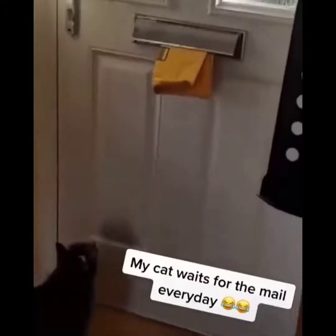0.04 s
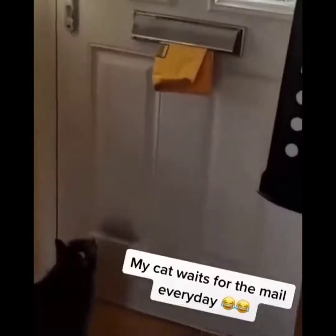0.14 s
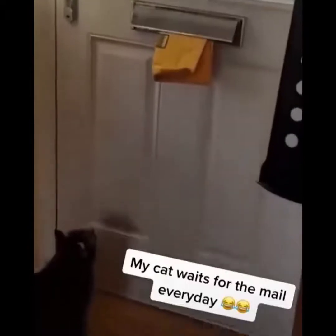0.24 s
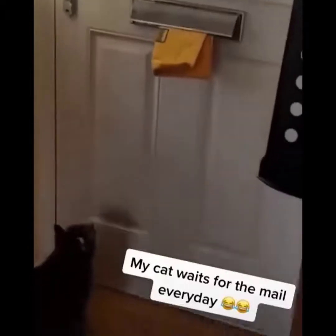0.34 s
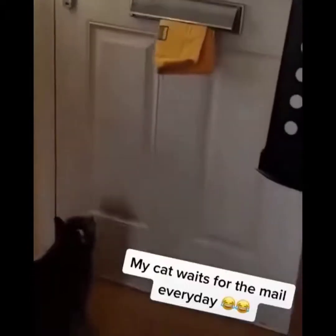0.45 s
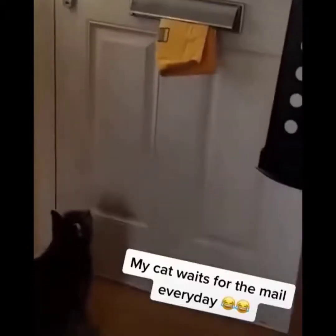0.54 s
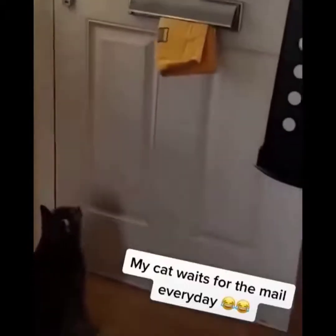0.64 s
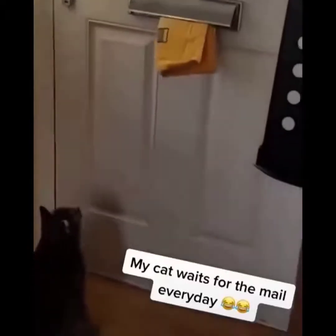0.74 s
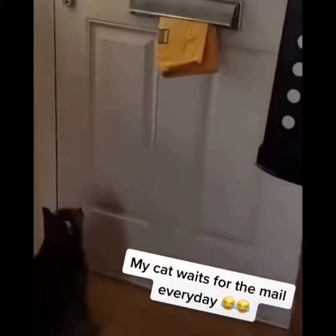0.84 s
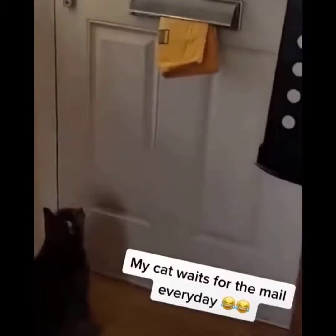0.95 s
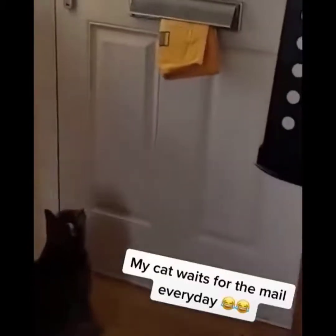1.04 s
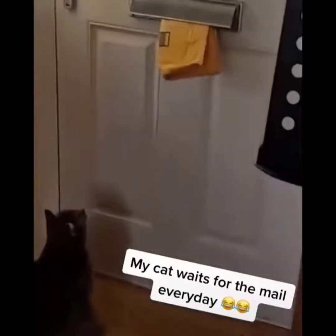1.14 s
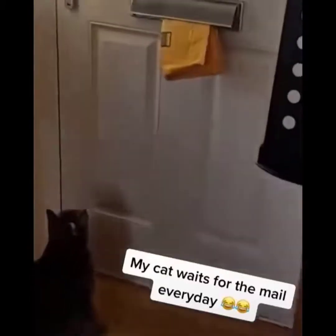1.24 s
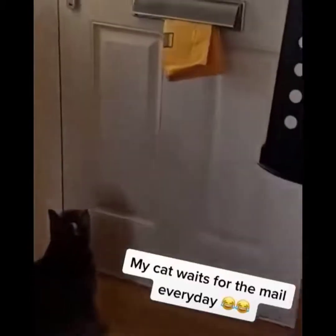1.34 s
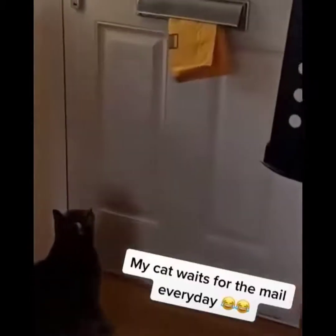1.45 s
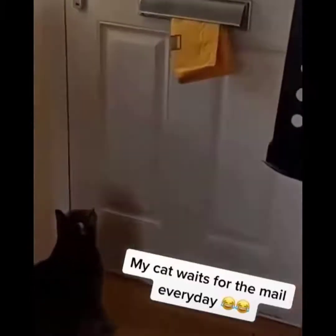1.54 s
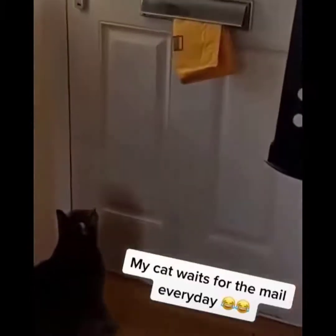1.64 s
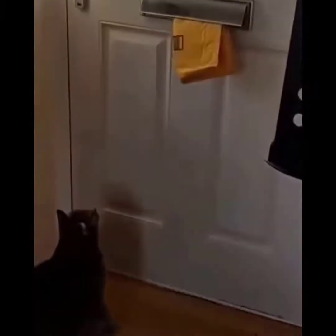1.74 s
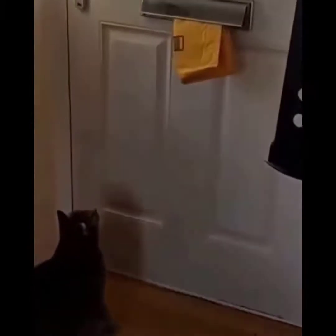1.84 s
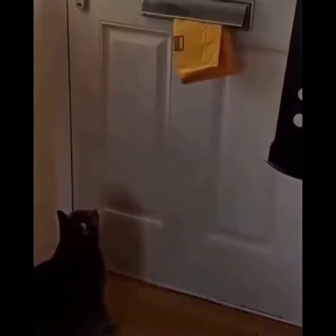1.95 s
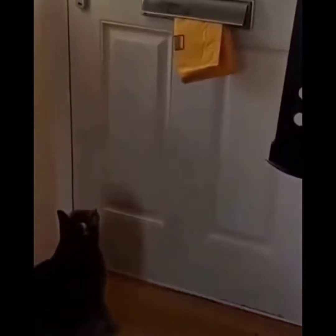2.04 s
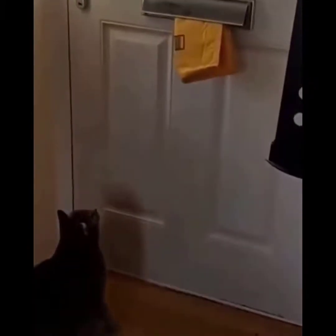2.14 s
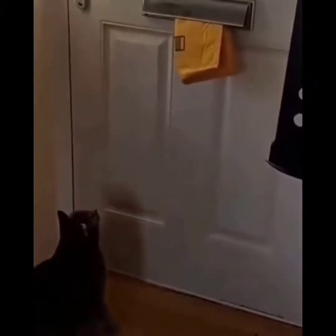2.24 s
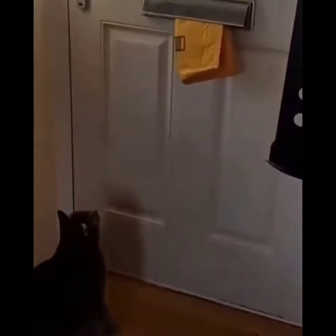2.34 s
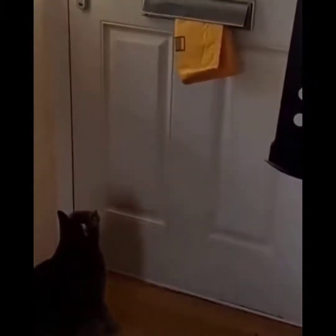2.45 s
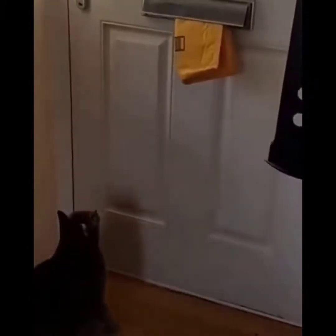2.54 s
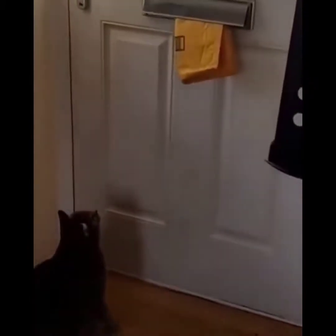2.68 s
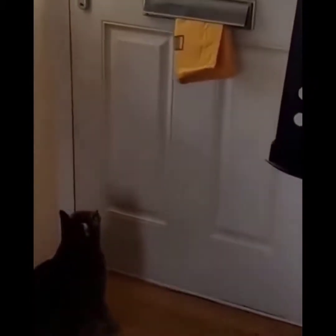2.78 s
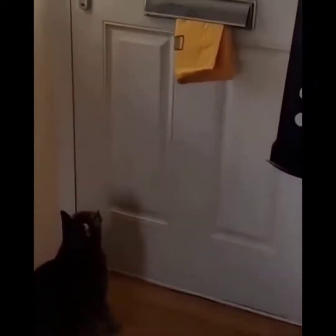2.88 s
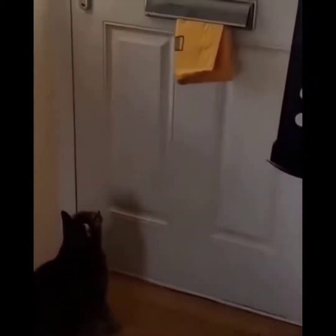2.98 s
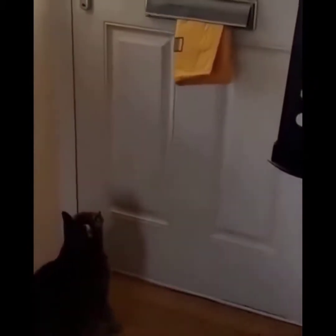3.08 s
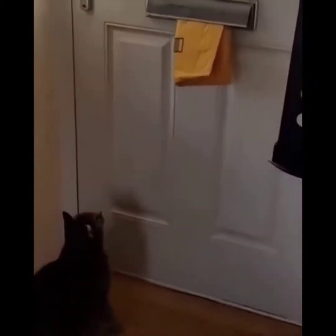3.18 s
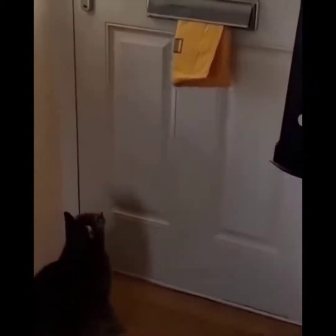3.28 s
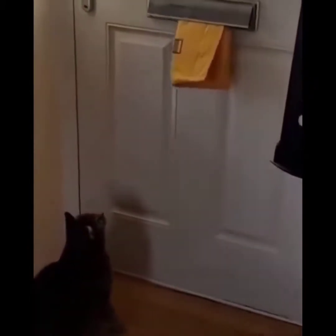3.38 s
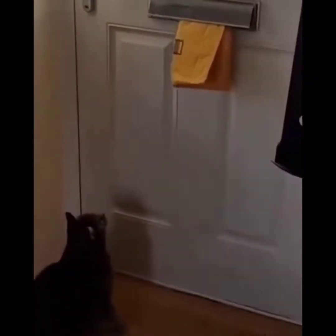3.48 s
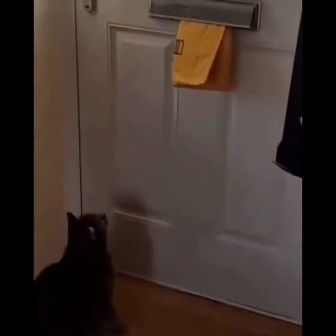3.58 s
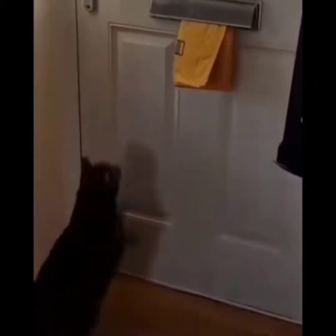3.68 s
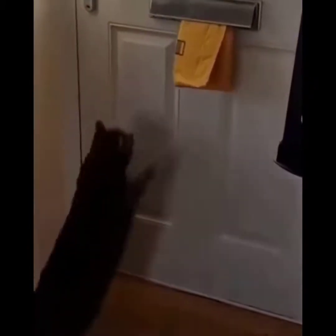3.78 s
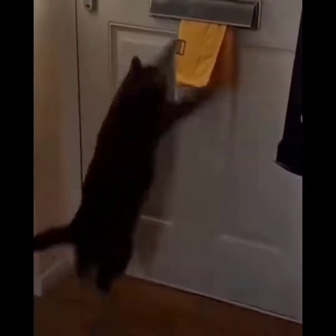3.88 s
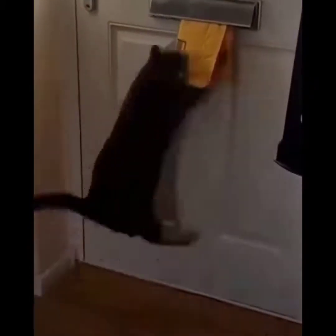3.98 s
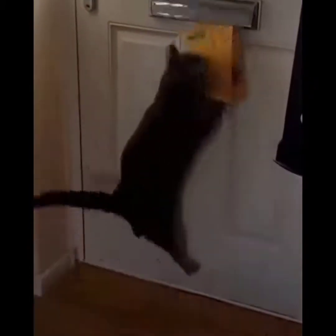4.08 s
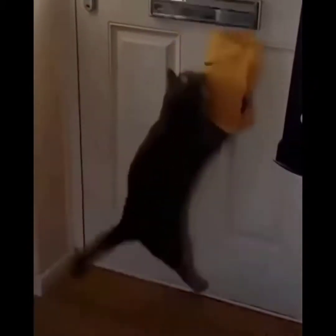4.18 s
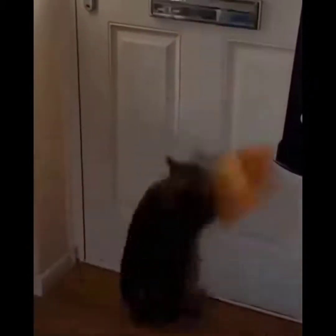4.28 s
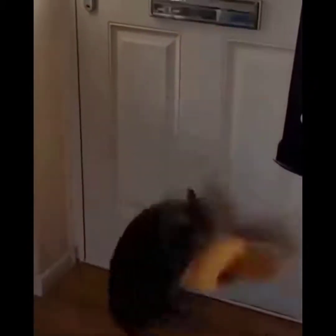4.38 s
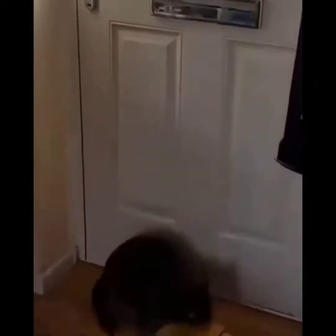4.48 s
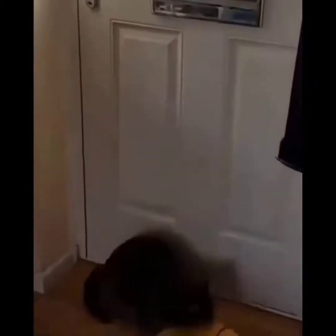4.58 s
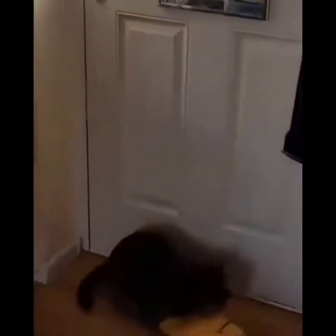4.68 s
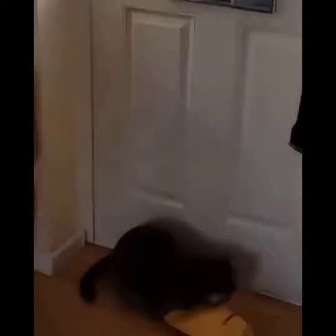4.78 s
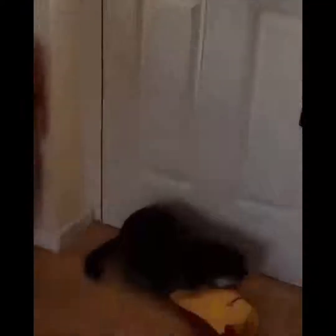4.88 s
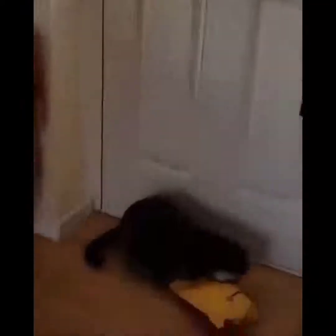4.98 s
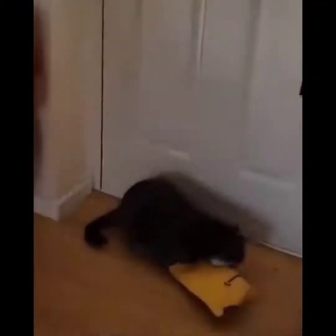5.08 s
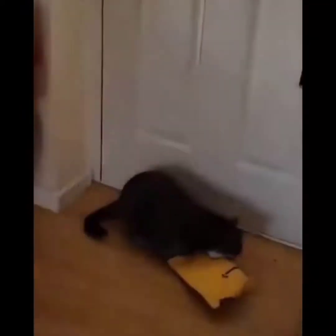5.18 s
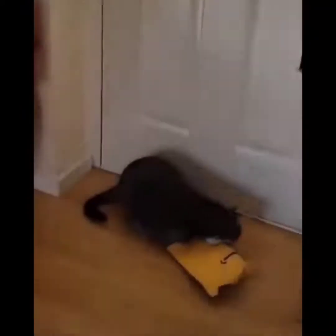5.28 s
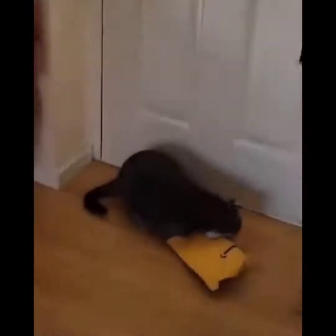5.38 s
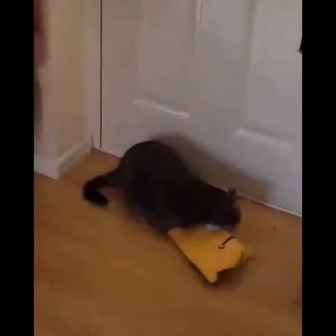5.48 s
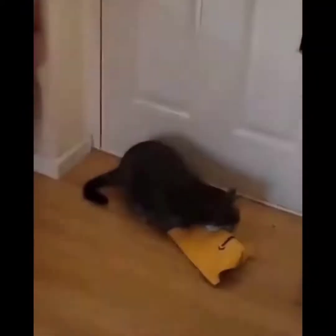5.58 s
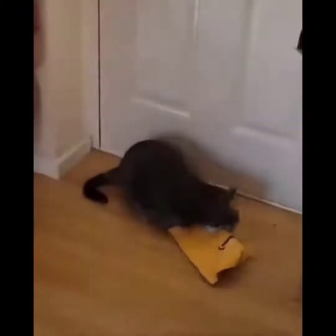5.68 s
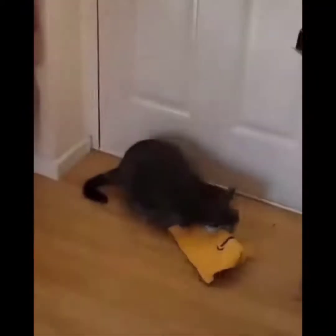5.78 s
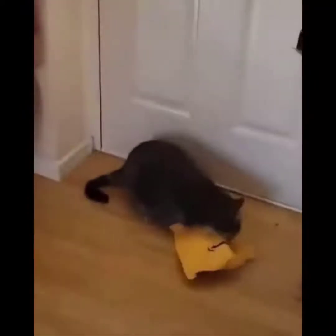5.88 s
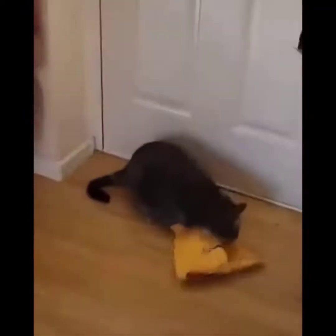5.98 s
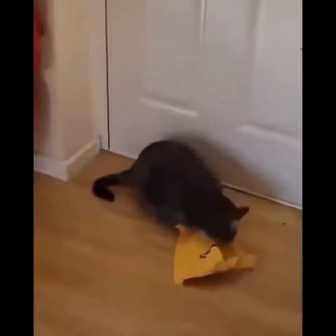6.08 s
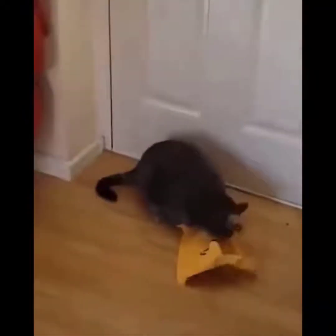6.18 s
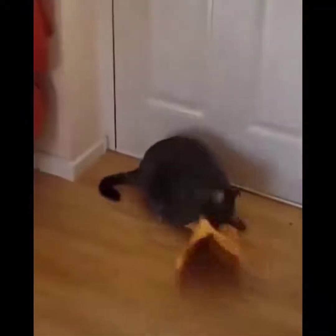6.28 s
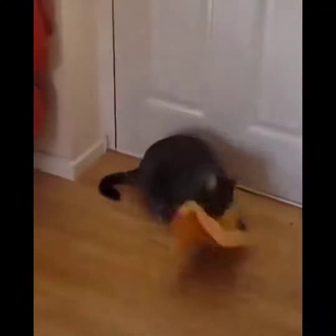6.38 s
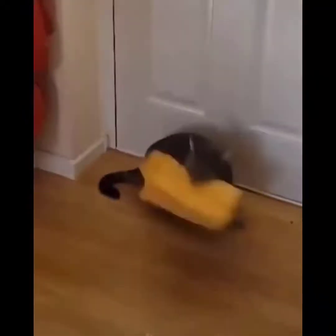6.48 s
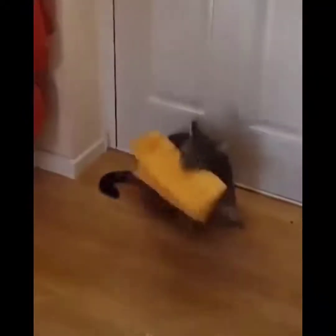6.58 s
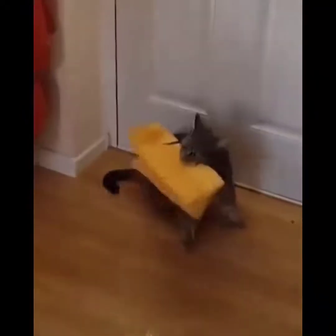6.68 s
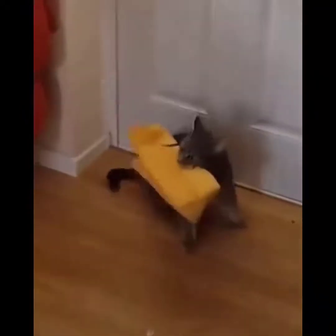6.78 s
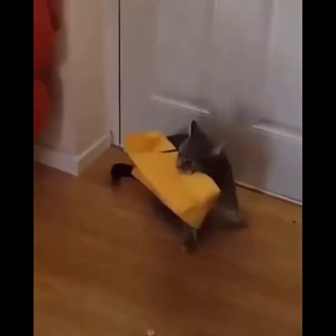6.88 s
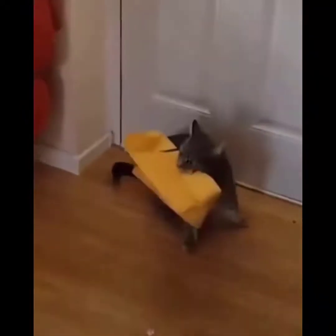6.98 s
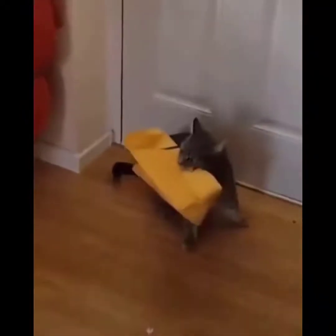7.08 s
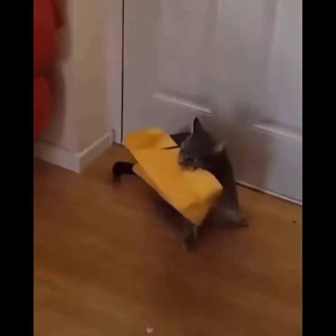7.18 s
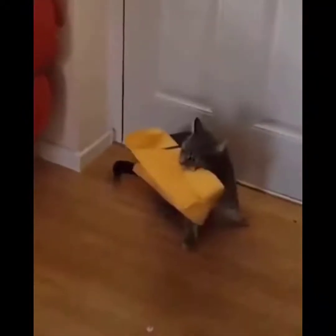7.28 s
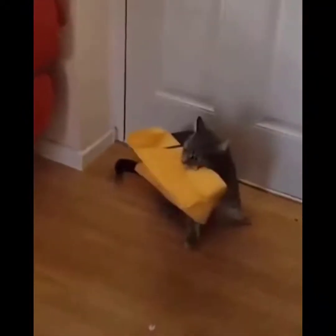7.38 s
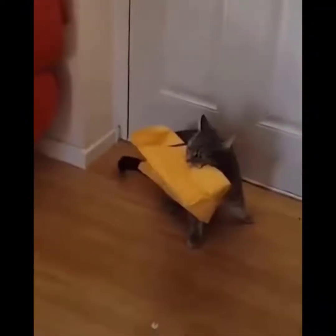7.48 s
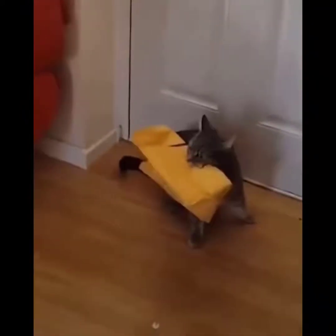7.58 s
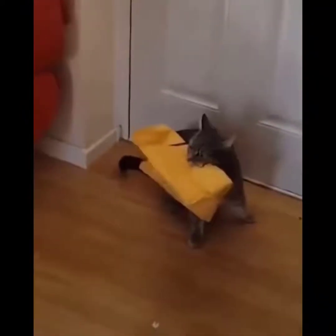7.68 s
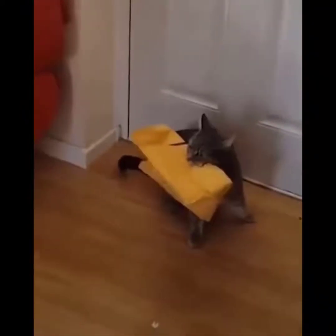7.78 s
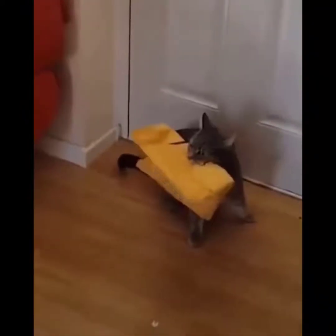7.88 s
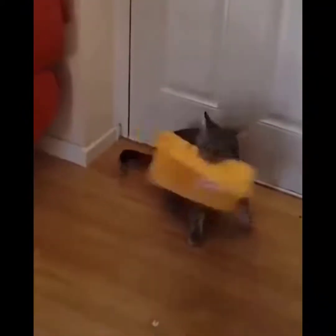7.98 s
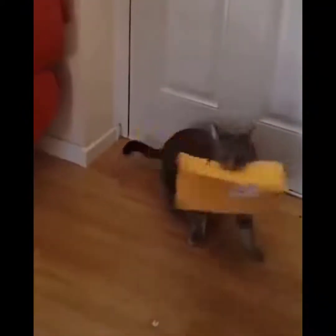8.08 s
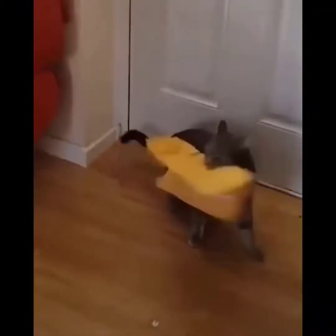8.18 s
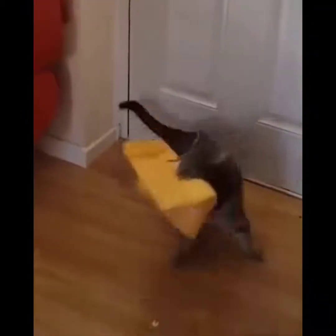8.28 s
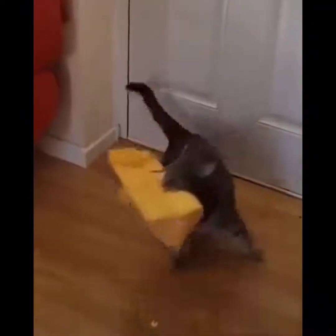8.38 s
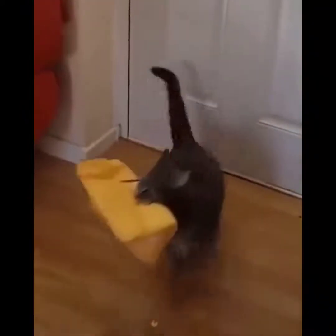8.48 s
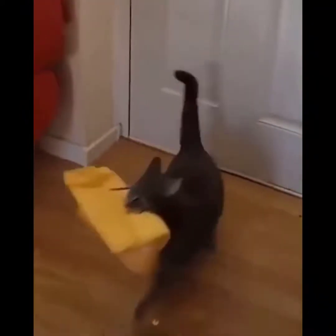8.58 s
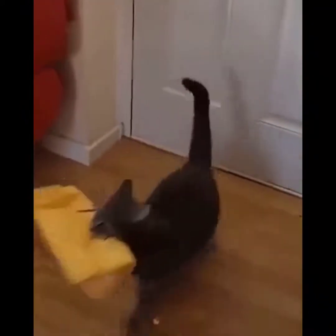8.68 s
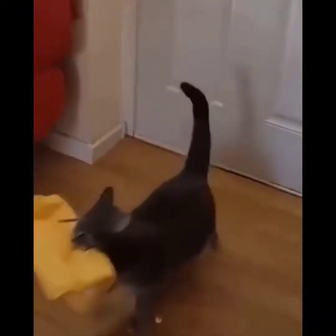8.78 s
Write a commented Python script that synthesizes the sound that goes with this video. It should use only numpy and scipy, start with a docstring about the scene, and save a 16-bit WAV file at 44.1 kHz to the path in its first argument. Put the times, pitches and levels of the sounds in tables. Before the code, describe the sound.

A padded envelope rustles through a metal letterbox, a cat yanks it down, the flap clashes shut and paper crinkles.

```python
"""A padded envelope rubs and crackles as it is worked through the metal letterbox of a front door,
in a small hall with a hard floor. An engine drones outside for the first four seconds or so.
A cat leaps up and tugs the envelope through; cat and parcel land, the door booms and the sprung flaps
clash shut. The cat paws and bites the crinkling paper, then moves off with a soft thump."""
import sys
import numpy as np
from scipy import signal
from scipy.fft import rfft, irfft
from scipy.io import wavfile
from scipy.ndimage import uniform_filter1d

SR = 44100
rng = np.random.default_rng(int(sys.argv[2]) if len(sys.argv) > 2 else 0)


def inscribe(sig):
    """Save sig as 16-bit PCM at rate SR to the path in sys.argv[1].

    A 1-D sig is mono; a 2-D sig holds one channel per row.
    Samples are clipped to [-1, 1] before scaling.
    """
    pcm = np.round(np.clip(np.atleast_2d(sig).T, -1, 1) * 32767)
    wavfile.write(sys.argv[1], SR, pcm.astype(np.int16))


N = 389844

# soft weight coming down on the floor: (time [s], relative level [dB])
LANDINGS = [(4.225, -18.5), (4.293, -28.5), (4.38, -19), (4.4, -9.5), (4.46, -20), (8.272, -17.5),
            (8.299, -22)]


def from_db(db):
    """Turn decibels into a number to multiply a sound by."""
    return 10 ** (np.asarray(db) / 20)


def rms_one(x):
    """Scale a signal so that its average power is 1."""
    return x / np.sqrt(np.mean(x ** 2) + 1e-20)


def at_hz(points, hz):
    """Read between the rows of a (frequency, value) table, spacing octaves evenly."""
    known, values = np.transpose(points)
    return np.interp(np.log(np.maximum(hz, 1)), np.log(known), values)


def drift(per_s):
    """A random wander of about 1 up and down, with per_s new targets a second."""
    targets = rng.standard_normal(N // 20)
    return rms_one(np.interp(np.arange(N) * per_s / SR, np.arange(len(targets)), targets))


def cut(x, hz, keep="low"):
    """Keep what lies below hz ("low"), above it ("high") or between two values ("band")."""
    return signal.sosfilt(signal.butter(2, hz, keep, fs=SR, output="sos"), x)


def colour(x, spectrum, size=8192):
    """Shape the tone by a (frequency, relative level) table; white noise keeps its power."""
    hz = np.maximum(np.arange(size // 2 + 1) * SR / size, 1)
    octaves_below = np.maximum(np.log2(spectrum[0][0] / hz), 0)
    octaves_above = np.maximum(np.log2(hz / spectrum[-1][0]), 0)
    gain = from_db(at_hz(spectrum, hz) - 20 * (octaves_below + octaves_above))
    # build the filter so that nothing sounds ahead of a hit
    cepstrum = irfft(np.log(gain))
    response = irfft(np.exp(rfft(2 * cepstrum * (np.arange(size) < size // 2))))
    return signal.oaconvolve(x, response / np.linalg.norm(response))[:len(x)]


def resonance(x, hz, width_hz):
    """Let through a band of frequencies around hz."""
    return signal.lfilter(*signal.iirpeak(hz, hz / width_hz, fs=SR), x + 1e-18)


def double_resonance(x, hz, width_hz):
    """The same band twice over, for a clearer pitch."""
    return resonance(resonance(x, hz, width_hz), hz, width_hz)


def dying(t60, size=28000):
    """A fade that drops 60 dB in t60 seconds; the tables call this the fade time."""
    return np.exp(-np.log(1000) / (SR * t60) * np.arange(size))


def even(x, smooth_hz=700, size=4096):
    """Level the broad humps in a short sound's tone; the fine detail stays."""
    power = uniform_filter1d(np.abs(rfft(x, size)) ** 2, int(smooth_hz * size / SR))
    hz = np.arange(len(power)) * SR / size
    levelling_db = -10 * np.log10(np.maximum(power, 1e-12))
    return colour(x, np.column_stack([hz, levelling_db])[1:])


def burst(t60, rise_s=0.0029):
    """A shower of tiny contacts that builds up and dies away."""
    decay = dying(t60)
    rise = np.minimum(np.arange(len(decay)) / SR / rise_s, 1)
    return even(decay * rise * rng.choice([-1, 1], len(decay)))


def blow(x):
    """Scale a short sound to the energy of 10 ms at full level."""
    return x * np.sqrt(.01 * SR / np.sum(x ** 2))


def pitched(t60, hz, width_hz):
    """A shower of contacts with one rough pitch."""
    return blow(double_resonance(burst(t60), hz, width_hz))


def ring(notes):
    """A struck object rings with its own notes, each fading at its own pace."""
    t = np.arange(len(dying(1))) / SR
    return sum(from_db(db) * dying(t60) * np.sin(2 * np.pi * hz * t) for hz, db, t60 in notes)


def pressed(x, press_s=.036):
    """Soften a sound's start, as a soft weight comes down gradually."""
    progress = np.minimum(np.arange(len(x)) / SR / press_s, 1)
    return x * np.sin(np.pi / 2 * progress) ** 2


def place(sounds):
    """Lay each (time [s], level [dB], sound) on the time line."""
    out = np.zeros(N)
    for s, db, sound in sounds:
        start = int(s * SR)
        out[start:start + len(sound)] += from_db(db) * sound[:N - start]
    return out


def engine(waver=0.0033, throb_db=4.5, fade_s=.3):
    """The engine's two lowest tones pass the closed door and swell where they meet a note of the hall."""
    # it pulls, eases off to change gear, pulls again: (time [s], firing rate [Hz], relative level [dB])
    driving = [(0, 84.8, -50), (.45, 89, -50.5), (.64, 90.5, -65), (1.3, 80.46, -61), (1.7, 69.7, -64),
               (2.05, 65.1, -66), (2.4, 69.35, -64.5), (2.95, 72.8, -60), (4.1, 80.8, -67.5)]
    # low notes of the hall: (frequency [Hz], width [Hz], gain [dB])
    hall_notes = [(72, 15, 4), (142.4, 4.2, -3), (162, 6, -8), (170, 27, 4.5)]
    t = np.arange(N) / SR
    times, rates, levels = np.transpose(driving)
    hz = np.interp(t, times, rates) * (1 + waver * drift(8.4))
    phase = 2 * np.pi * np.cumsum(hz) / SR
    drone = np.sqrt(2) * from_db(np.interp(t, times, levels)) * (np.sin(phase) + np.sin(2 * phase))
    indoors = sum(from_db(db) * resonance(drone, note_hz, width) for note_hz, width, db in hall_notes)
    fade_out = np.clip(1 + (times[-1] - t) / fade_s, 0, 1)
    return indoors * fade_out * from_db(throb_db * drift(7.6))


def still_air(level_db=-56):
    """The air of the hall makes a faint, low hush."""
    # tone of the hush: (frequency [Hz], relative level [dB])
    hush_tone = [(15, -42.5), (25, -11.5), (70, -0.5), (147, -10.5), (403, -28.5), (868, -31),
                 (1560, -35.5), (2640, -31.5), (9660, -37.5), (12600, -35.5), (14000, -51.5)]
    return from_db(level_db) * colour(rng.standard_normal(N), hush_tone)


def friction(clicks_per_s, clicks_db, flutter_db, spread_db=4.0):
    """Paper fibres hiss while creases catch and let go in uneven clicks."""
    sizes = from_db(spread_db * np.minimum(rng.exponential(1, N), 4)) * rng.choice([-1, 1], N)
    clicks = rms_one(sizes * (rng.random(N) < clicks_per_s / SR))
    hiss = rng.standard_normal(N)
    return rms_one((hiss + from_db(clicks_db) * clicks) * from_db(flutter_db * drift(70)))


def flexing(x, depth_db, per_s, count=21):
    """As the envelope bends, the sound shifts among its many resonances while the loudness holds."""
    edges = np.geomspace(500, 14000, count)
    gains = np.array([from_db(depth_db * np.tanh(drift(per_s))) for _ in range(count - 1)])
    gains /= np.sqrt(np.mean(gains[count // 4:-count // 5] ** 2, axis=0))   # steady the middle bands
    low_body = from_db(11) * cut(x, edges[0])
    bands = sum(gain * resonance(x, np.sqrt(low * high), high - low)
                for gain, low, high in zip(gains, edges, edges[1:]))
    return rms_one(low_body + bands)


def through_slot(x, cavity_db, echo_delays_s=(.0011, .0023, .0047), echo_db=-7):
    """The hollow letterbox colours what rubs inside it; the flap and door face reflect the treble."""
    # notes of the air in the slot: (frequency [Hz], width [Hz], relative level [dB])
    slot_notes = [(815, 99, -9), (1183, 46, 5.5), (2340, 200, -4.5), (2600, 140, -2.5)]
    treble = cut(x, 2500, "high")
    echoes = sum(np.roll(treble, int(s * SR)) for s in echo_delays_s)
    cavity = sum(from_db(db) * resonance(x, hz, width) for hz, width, db in slot_notes)
    return rms_one(x + from_db(echo_db) * echoes + from_db(cavity_db) * cavity)


def strokes(rows, rise_db_per_s, fall_db_per_s):
    """The loudness of a run of strokes: each gathers speed, holds and slides to rest."""
    t, power = np.arange(0, N, 40) / SR, 0
    for s, held_s, db in rows:
        slowed_db = rise_db_per_s * np.maximum(s - t, 0) + fall_db_per_s * np.maximum(t - s - held_s, 0)
        power = power + from_db(db - slowed_db) ** 2
    return np.interp(np.arange(N) / SR, t, np.sqrt(power + 1e-20))


def rubbed(x, rows, rise_db_per_s, fall_db_per_s):
    """Play a rubbing sound in strokes, each with its own share of top treble."""
    top = resonance(x, hz=10700, width_hz=10000)
    body_rows = [(s, held_s, db) for s, held_s, db, _ in rows]
    top_rows = [(s, held_s, db + top_db) for s, held_s, db, top_db in rows]
    body_gain = strokes(body_rows, rise_db_per_s, fall_db_per_s)
    top_gain = strokes(top_rows, rise_db_per_s, fall_db_per_s)
    return body_gain * (x - top) + top_gain * top


def envelope():
    """The envelope rubs in the slot, rushes through it, and crinkles as it is dragged about."""
    # shoves into the slot, the cat's tugs, and drags over the floor:
    # (time at full speed [s], held for [s], relative level [dB], extra top treble [dB])
    pushes = [(0.054, 0.026, -36.5, 11), (.15, 0.066, -45.5, 0), (.245, 0.037, -29, 5),
              (.39, 0.062, -48, -4), (0.664, 0.11, -39, 9), (1.043, 0.021, -39, 8.5),
              (1.15, 0.013, -39, -1), (1.25, 0.024, -42.5, -1), (1.551, 0.031, -43.5, 9.5),
              (1.67, 0.069, -48.5, 9), (1.878, 0.053, -47, 8), (2.198, 0.029, -51, -20),
              (2.269, 0.048, -44.5, -19), (2.499, 0.019, -46, -20), (2.621, 0.0069, -44.5, -1),
              (2.978, 0.077, -44, 6), (3.242, 0.16, -48, 12.5), (3.52, 0.11, -43, 9),
              (3.793, 0.074, -50, 17)]
    tugs = [(4.151, 0.054, -20, 4.5), (4.249, 0.031, -19, -9.5), (4.36, 0.11, -23.5, -2)]
    drags = [(4.62, 0.15, -36, 0), (4.99, 0.0051, -45.5, 1), (5.166, 0.0048, -31.5, -4),
             (5.235, 0.087, -43.5, 7.5), (5.47, 0.042, -39.5, -2), (5.678, 0.093, -43, -0.5),
             (5.8, 0.04, -30, -7.5), (6.038, 0.14, -42.5, 6.5), (6.178, 0.14, -40, 9), (6.4, 0.078, -35, 1),
             (6.573, 0.022, -30.5, 3.5)]
    # tone of each kind of rubbing: (frequency [Hz], relative level [dB])
    push_tone = [(200, -11), (300, -16), (420, -10.5), (600, -6), (830, 3.5), (1220, -3), (1480, -2),
                 (2150, -6), (4300, -10.5), (6500, -17.5), (7900, -31.5), (9500, -29.5), (12200, -29.5),
                 (13500, -43)]
    tug_tone = [(90, -15.5), (230, -8.5), (330, -16), (600, -5), (850, 3.5), (1050, -3), (1280, 2.5),
                (1600, -3.5), (2400, -6), (4500, -11), (6500, -12), (8000, -22), (9400, -16.5),
                (12500, -23), (14000, -53)]
    drag_tone = [(240, -32.5), (400, -1), (787, 0.5), (1620, 3.5), (2020, 6.5), (4410, 2.5), (6190, -4.5),
                 (7950, -13), (11800, -10), (13500, -48.5)]
    rubbing = flexing(friction(clicks_per_s=490, clicks_db=-7, flutter_db=1.1), depth_db=7.5, per_s=20)
    # speed packs the catches closer
    rushing = flexing(friction(clicks_per_s=2600, clicks_db=1.5, flutter_db=0.5), depth_db=11, per_s=55)
    push = through_slot(colour(rubbing, push_tone), cavity_db=1.5)
    tug = through_slot(colour(rushing, tug_tone), cavity_db=-8)
    drag_hiss = rms_one(colour(rubbing, drag_tone))
    drag = rms_one(drag_hiss + from_db(-3.5) * crinkles())
    return (from_db(-3.5) * rubbed(push, pushes, rise_db_per_s=190, fall_db_per_s=122)
            + from_db(-0.46) * rubbed(tug, tugs, rise_db_per_s=620, fall_db_per_s=179.5)
            + from_db(-2.5) * rubbed(drag, drags, rise_db_per_s=221.5, fall_db_per_s=151))


def ticks():
    """The slot, claws and teeth snag the padding in tiny bright punctures."""
    # snags: (time [s], level [dB], fade time [s])
    snags = [(0.056, -36, 0.17), (4.111, -26.5, 0.13), (5.106, -39, 0.062), (5.423, -38.5, 0.0085),
             (5.444, -42, 0.012), (5.552, -35, 0.0066), (8.608, -49, 0.3)]
    # tone of a puncture: (frequency [Hz], relative level [dB])
    tick_tone = [(1200, -16), (3300, -2.5), (5300, 4), (7000, -5.5), (10000, -13), (13000, -10.5),
                 (15500, -35)]
    return place((s, db, blow(colour(burst(t60), tick_tone))) for s, db, t60 in snags)


def creases():
    """A crease buckles in a quick crackling run; broad folds sound duller."""
    # creases giving way: (time [s], level [dB], fade time [s], dull above [Hz])
    buckles = [(0.23, -29.5, 0.079, 4500), (0.253, -36, 0.043, 5000), (0.649, -44, 0.059, 6000),
               (1.04, -38, 0.063, 5000), (1.119, -32, 0.039, 5360), (2.323, -38.5, 0.057, 3460),
               (4.124, -24.5, 0.13, 11100), (4.152, -21.5, 0.044, 7015), (4.193, -17, .02, 4500),
               (4.207, -14.5, 0.037, 4500), (4.26, -20, 0.03, 3935), (4.292, -28, .025, 4048),
               (5.143, -31.5, 0.037, 4600), (5.229, -33.5, 0.032, 6440), (5.298, -27.5, 0.051, 2960),
               (5.625, -36, 0.04, 7500), (5.828, -28.5, 0.031, 5900), (6.157, -32, 0.11, 4970),
               (6.198, -28, 0.085, 2180), (6.284, -29, 0.057, 9000), (6.424, -30, 0.042, 3000),
               (6.976, -52, 0.33, 8030), (7.27, -57.5, 0.17, 7020), (7.643, -62, 0.11, 7000),
               (8.29, -40.5, 0.14, 2070)]
    # tone of the crackle: (frequency [Hz], relative level [dB])
    crease_tone = [(200, -9), (400, -13.5), (750, -4.5), (1200, -5), (3500, -4.5), (6000, -5), (9000, -25),
                   (12000, -9.5), (14000, -38)]
    return place((s, db, blow(cut(colour(burst(t60), crease_tone), hz))) for s, db, t60, hz in buckles)


def slaps():
    """Shoved, pawed or lifted, the whole envelope snaps over with a short, dry crack."""
    # snaps: (time [s], level [dB], fade time [s])
    snaps = [(1.116, -32, 0.018), (5.295, -34, .014), (5.78, -36, 0.02), (6.442, -15.5, 0.038),
             (6.4483, -25, 0.017), (6.46, -30.5, 0.061)]
    # tone of a snap: (frequency [Hz], relative level [dB])
    snap_tone = [(200, 1), (450, -10), (850, 1), (1600, -3), (3000, 1), (4000, -4.5), (5200, -3.5),
                 (7000, -17), (8500, -18.5), (11000, -22), (14000, -40.5)]
    return place((s, db, blow(colour(burst(t60, rise_s=0.007), snap_tone))) for s, db, t60 in snaps)


def squeaks(relative_width=.16):
    """Paper catches on the metal slot and chirps at one rough pitch for a moment."""
    # squeaks and clinks: (time [s], level [dB], pitch [Hz], fade time [s])
    chirps = [(1.668, -38, 2940, .035), (2.614, -36, 1170, .028), (4.15, -22, 2520, .07),
              (4.172, -18, 870, .07)]
    return place((s, db, pitched(t60, hz, hz * relative_width)) for s, db, hz, t60 in chirps)


def taps(contact_t60=0.029, relative_width=1.6):
    """Light knocks of the metal flap and on the wood of the door and floor die away at once."""
    # dull knocks: (time [s], level [dB], pitch [Hz])
    knocks = [(2.321, -37, 584), (2.615, -38, 740), (5.623, -30.5, 645), (5.84, -33, 400)]
    return place((s, db, pitched(contact_t60, hz, hz * relative_width)) for s, db, hz in knocks)


def bumps(relative_width=.9, scuff_db=-9):
    """A paw, a corner of the parcel or the closing flap strikes: one round pulse, drawn out when the contact is
    soft."""
    # bumps on wood: (time [s], level [dB], pitch [Hz], contact time [s])
    contacts = [(4.221, -15, 230, .006), (4.642, -22, 270, .004), (4.678, -19, 300, .0015),
                (5.110, -35.5, 640, .003), (5.231, -41, 520, .002), (5.623, -33, 330, .002),
                (5.829, -27.5, 290, .001)]

    def bump(hz, contact_s):
        scuff = blow(resonance(burst(.03), hz * 2, hz * 2))
        t = np.arange(len(scuff)) / SR
        pulse = np.sin(2 * np.pi * hz * t) * np.exp(-t / contact_s) * np.minimum(t / contact_s, 1)
        return blow(resonance(pulse, hz, hz * relative_width)) + from_db(scuff_db) * scuff
    return place((s, db, bump(hz, contact_s)) for s, db, hz, contact_s in contacts)


def thuds(pad_t60=.11):
    """Padded weight thuds onto the floor, and paws scuffle on the boards."""
    # paw strokes: (time at full speed [s], held for [s], relative level [dB])
    scuffles = [(5.48, 0.03, -41), (5.63, 0.013, -34.5), (5.79, 0.042, -34), (6.2, 0.0091, -39),
                (6.445, 0.013, -37), (6.58, 0.018, -40.5)]
    # tones of a thud and a scuffle: (frequency [Hz], relative level [dB])
    thud_tone = [(40, -18.5), (70, -11), (110, -1.5), (200, 10), (350, -5.5), (600, -8), (900, -24),
                 (1250, -24.5), (1550, -15), (2000, -25.5), (3000, -32.5), (6000, -32), (12000, -63)]
    scuffle_tone = [(70, -17), (140, -1), (240, -2), (400, -12), (800, -12.5), (2000, -50)]
    pads = place((s, db, blow(colour(pressed(burst(pad_t60)), thud_tone))) for s, db in LANDINGS)
    rough_noise = rng.standard_normal(N) * from_db(2.0 * np.tanh(drift(51)))
    paw_gain = strokes(scuffles, rise_db_per_s=282, fall_db_per_s=185)
    return from_db(-6) * pads + from_db(-3) * paw_gain * colour(rough_noise, scuffle_tone)


def boards(gain_db=12.5):
    """The floor swells into its low notes under each soft landing, and soon stops."""
    # notes of the floor: (frequency [Hz], relative level [dB], fade time [s])
    floor_notes = [(67, -21, .5), (82, 0, .17), (160, -10, .12), (205, -12, .11), (330, -19, .13),
                   (460, -23, .14)]
    return from_db(gain_db) * place((s, db, pressed(ring(floor_notes))) for s, db in LANDINGS)


def door(gain_db=-6):
    """Each blow sets the door panel booming with its low notes."""
    # blows that shake the door: (time [s], relative level [dB])
    hits = [(4.227, -23), (4.374, -5.5), (4.389, 1.5), (4.408, 5), (4.456, -12.5), (4.676, -26.5)]
    # notes of the panel: (frequency [Hz], relative level [dB], fade time [s])
    door_notes = [(66, -15, .65), (87, -16, .4), (155, -4.5, .27), (210, 2, .14), (275, -12, .2),
                  (336, -8.5, .24), (408, -15, .16), (463, -16, .15), (596, -16, .25), (716, -13, .13)]
    return from_db(gain_db) * place((s, db, ring(door_notes)) for s, db in hits)


def flaps(zing_hz=11200, zing_width_hz=1500):
    """The metal flaps hit their frame, each time with a crack and a zing of the spring."""
    # clashes: (time [s], relative crack level [dB], fade time [s], relative zing level [dB])
    clashes = [(4.376, -5.5, 0.036, -15), (4.394, -9.5, 0.013, -18), (4.414, -10, 0.064, -20),
               (4.439, -14.5, 0.05, -34), (4.676, -2, 0.022, -40)]
    # tone of the crack: (frequency [Hz], relative level [dB])
    crack_tone = [(100, -11), (280, 2.5), (420, 3), (700, 1.5), (1000, -4), (3000, -0.5), (5500, -6),
                  (7000, -15.5), (11500, -24), (13000, -38.5), (16000, -35)]
    sounds = []
    for s, crack_db, t60, zing_db in clashes:
        sounds.append((s, crack_db, blow(colour(burst(t60), crack_tone))))
        sounds.append((s, zing_db, pitched(t60, zing_hz, zing_width_hz)))
    return place(sounds)


def slams(relative_width=3.4):
    """A flap meets its frame squarely: one hard pulse."""
    # flaps slamming home: (time [s], level [dB], centre frequency [Hz])
    closings = [(4.381, -17, 800), (4.679, -14, 650)]
    click = signal.unit_impulse(2048)
    return place((s, db, blow(double_resonance(click, hz, hz * relative_width)))
                 for s, db, hz in closings)


def plate():
    """The metal plate of the flap rings on after the hardest clashes."""
    # hard clashes: (time [s], relative level [dB])
    hits = [(4.396, -19), (4.679, -27)]
    # notes of the plate: (frequency [Hz], relative level [dB], fade time [s])
    plate_notes = [(866, -5, .25), (1202, -2, .25), (1298, -5, .22), (2200, -5, .22), (2640, -1, .22),
                   (2880, -1, .18), (3524, -6, .2), (4711, -6, .22), (5373, -2, .18), (6530, -9, .27),
                   (7423, -5, .3), (7423, -5, .3), (7620, -9, .3), (9819, -9, .34), (10510, -8, .25),
                   (11320, -9, .2)]
    return place((s, db, ring(plate_notes)) for s, db in hits)


def hall_response(tail_delay_s=0.00079, echo_t60=0.04, echoes_db=-3, count=14):
    """Separate echoes come off the near walls, with a smooth tail that dies sooner in the treble."""
    # how long the hall rings: (frequency [Hz], fade time [s])
    fade_times = [(100, 0.61), (500, 0.47), (2500, 0.48), (6000, 0.41), (12000, 0.18)]
    tail, edges = 0, np.geomspace(30, 18000, 10)
    for low, high in zip(edges, edges[1:]):
        decay = dying(at_hz(fade_times, np.sqrt(low * high)))
        tail = tail + decay * cut(rng.standard_normal(len(decay)), [low, high], "band")
    tail *= np.clip(np.arange(len(tail)) / SR / tail_delay_s - 1, 0, 1)
    signs = rng.choice([-1, 1], count)
    delays_s = rng.uniform(.001, .035, count)
    echoes = np.zeros(len(tail))
    echoes[(delays_s * SR).astype(int)] = signs
    response = rms_one(tail) + from_db(echoes_db) * rms_one(echoes * dying(echo_t60))
    return response / np.linalg.norm(response)


def in_hall(x, response, echo_db):
    """Share a sound between the straight path to the ear and the echoes of the hall."""
    echo_gain = from_db(echo_db)
    return (x + echo_gain * signal.oaconvolve(x, response)[:N]) / np.hypot(1, echo_gain)


def crinkles(per_s=110, spread_db=3.0, clump_db=7.5, relative_width=.4, count=12):
    """Small folds of the dragged envelope pop in clumps, each briefly at a pitch of its own."""
    sizes = from_db(spread_db * np.minimum(rng.exponential(1, N), 2)) * rng.choice([-1, 1], N)
    pops = sizes * (rng.random(N) < per_s * from_db(clump_db * np.tanh(drift(30))) / SR)
    pitch_choice = rng.integers(0, count, N)
    pitches = np.geomspace(1500, 6000, count)
    return rms_one(sum(double_resonance(pops * (pitch_choice == k), hz, hz * relative_width) / np.sqrt(hz)
                       for k, hz in enumerate(pitches)))


def scene():
    """Mix the paper, letterbox, knocks, engine and air in the hall."""
    hall = hall_response()
    short_hall = hall * dying(t60=.4)   # the hall soaks up small contacts sooner
    paper = (in_hall(envelope(), hall, echo_db=-10)
             + in_hall(creases(), hall, echo_db=5)
             + in_hall(slaps(), hall, echo_db=-7)
             + in_hall(ticks(), hall, echo_db=-7.5)
             + in_hall(squeaks(), short_hall, echo_db=-7))
    letterbox = (from_db(-7) * in_hall(flaps(), hall, echo_db=5)
                 + in_hall(slams(), hall, echo_db=-10)
                 + plate() + door())
    knocks = (in_hall(taps(), hall, echo_db=2)
              + in_hall(bumps(), hall, echo_db=-10)
              + in_hall(thuds(), short_hall, echo_db=-3.5)
              + boards())
    return (paper + letterbox + knocks + still_air() + engine())[None]


def record(dry, dip_depth=0.51, ceiling=0.96, cutoff_hz=15800):
    """The microphone's opening makes a dip in the treble; loud peaks are flattened and the top is cut."""
    heard = dry - dip_depth * resonance(dry, hz=8000, width_hz=1300)
    flattened = heard / (1 + (heard / ceiling) ** 4) ** (1 / 4)
    return signal.sosfilt(signal.cheby2(14, 70, cutoff_hz, fs=SR, output="sos"), flattened)


dry = scene()
out = record(dry)
inscribe(out)
```